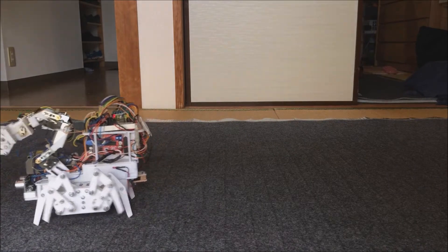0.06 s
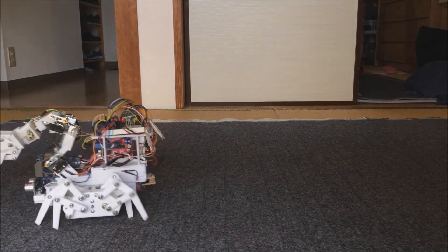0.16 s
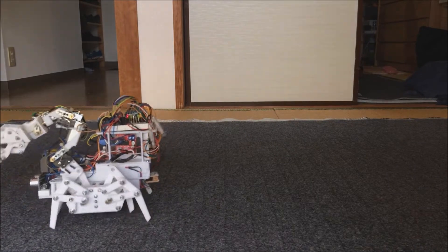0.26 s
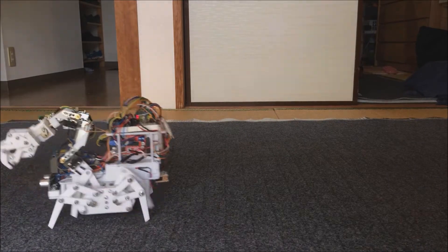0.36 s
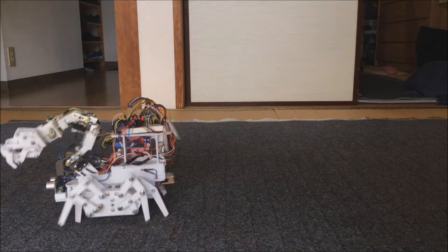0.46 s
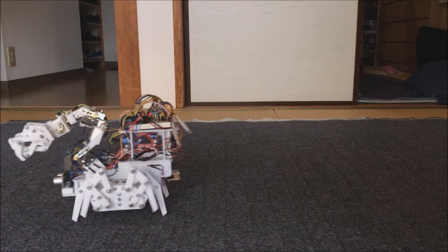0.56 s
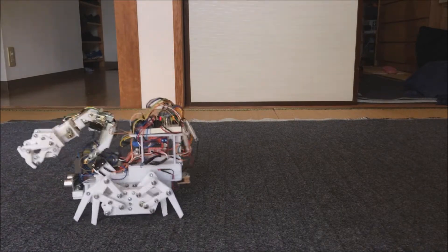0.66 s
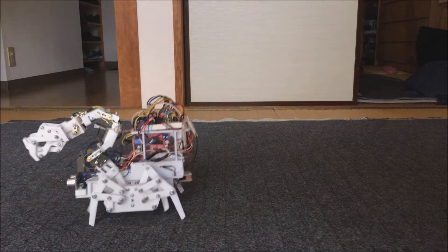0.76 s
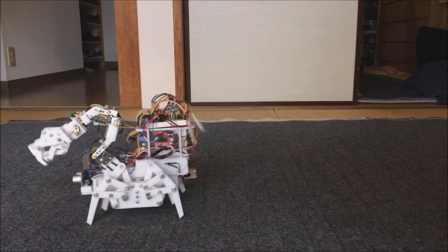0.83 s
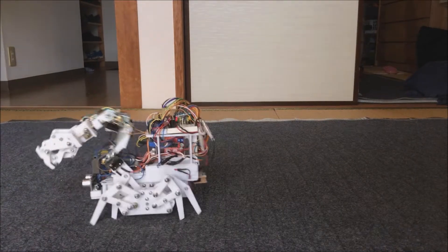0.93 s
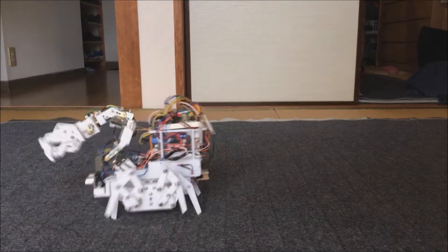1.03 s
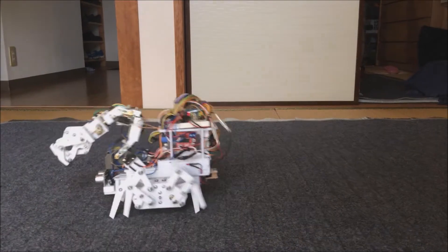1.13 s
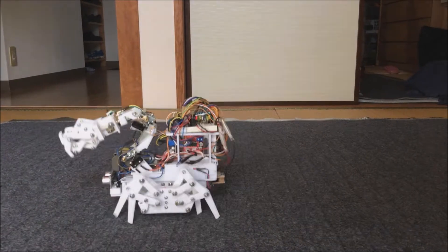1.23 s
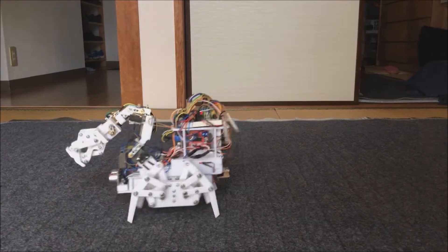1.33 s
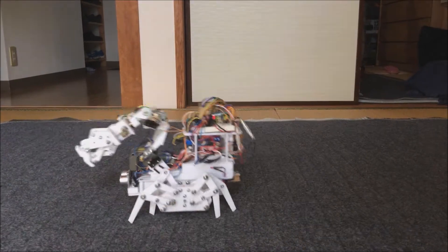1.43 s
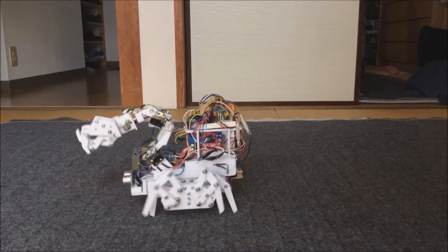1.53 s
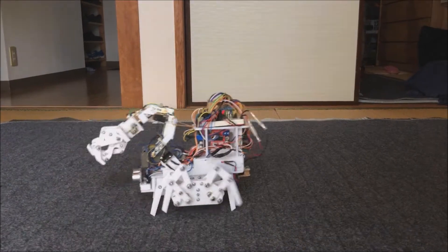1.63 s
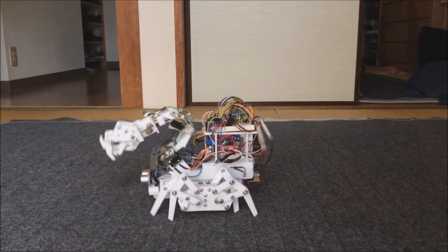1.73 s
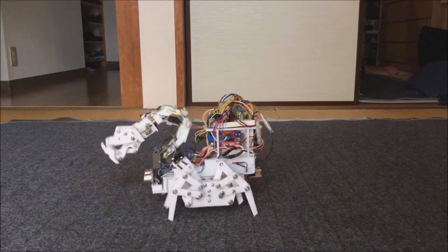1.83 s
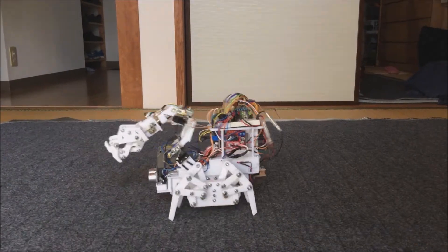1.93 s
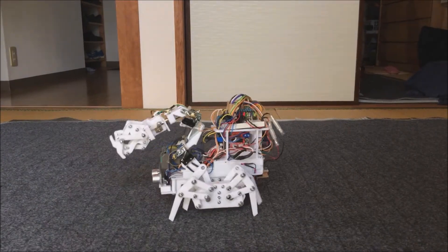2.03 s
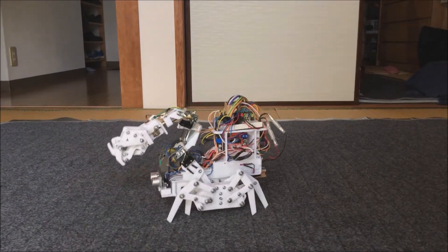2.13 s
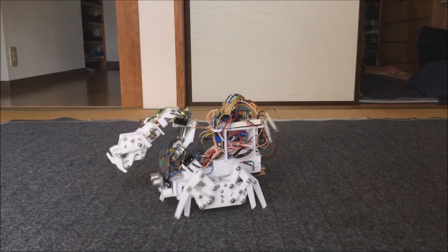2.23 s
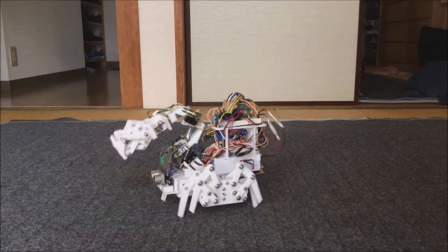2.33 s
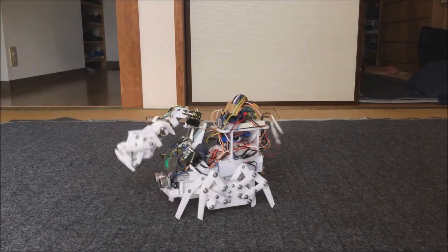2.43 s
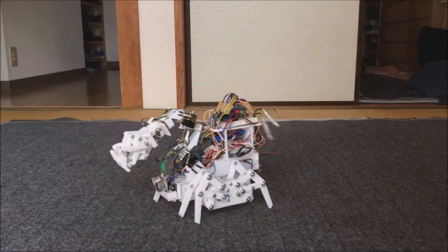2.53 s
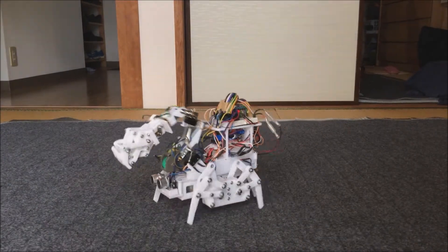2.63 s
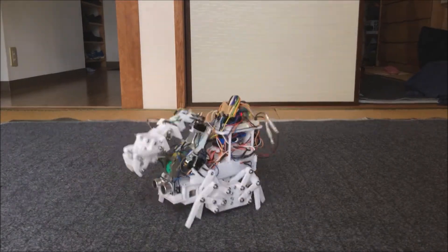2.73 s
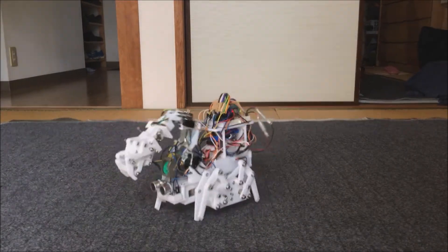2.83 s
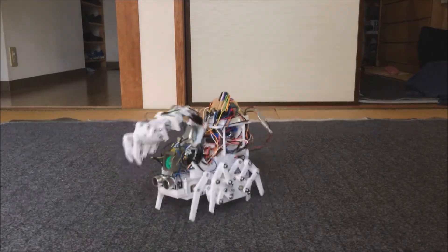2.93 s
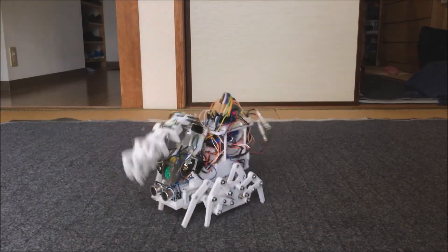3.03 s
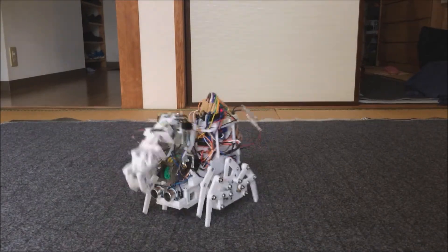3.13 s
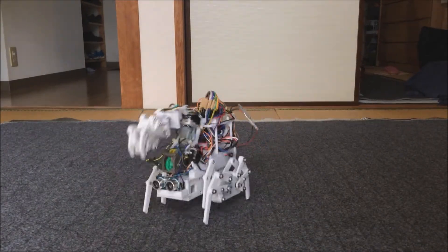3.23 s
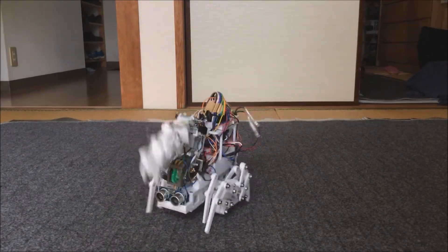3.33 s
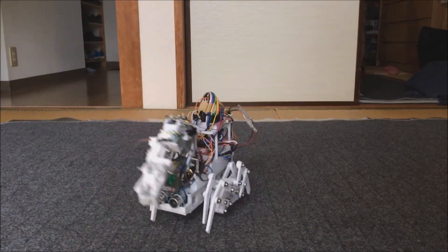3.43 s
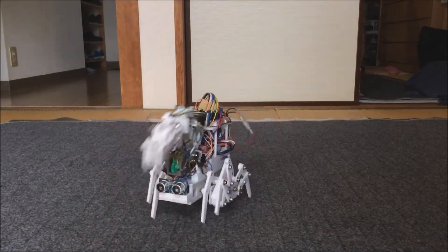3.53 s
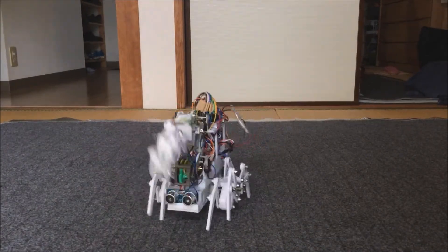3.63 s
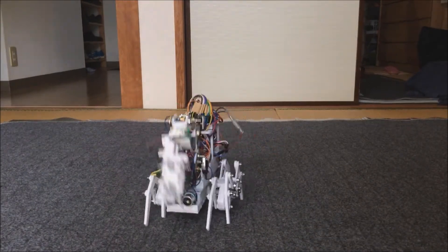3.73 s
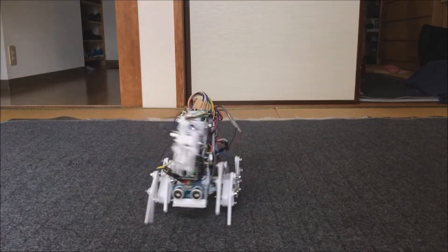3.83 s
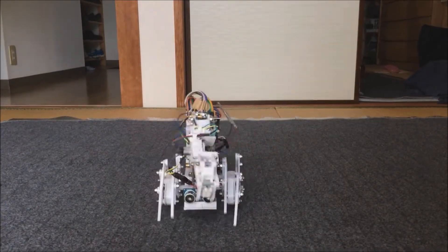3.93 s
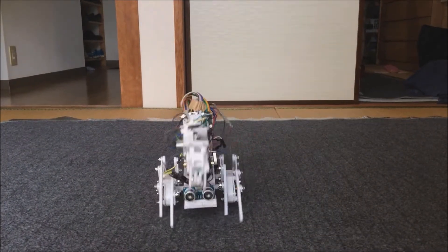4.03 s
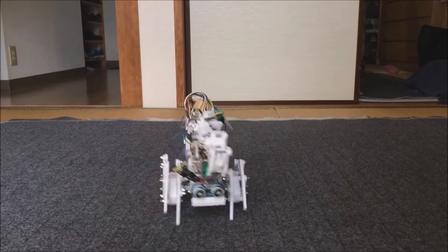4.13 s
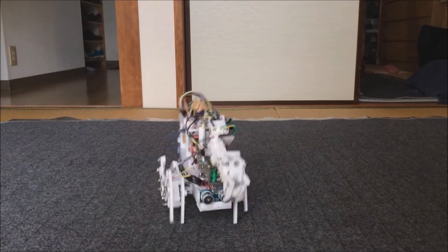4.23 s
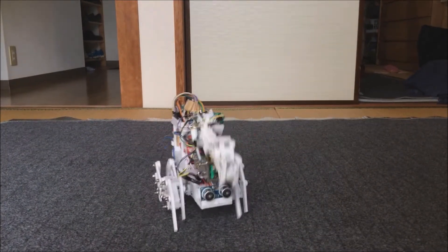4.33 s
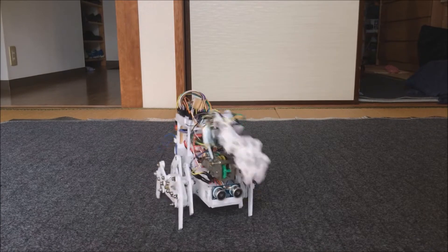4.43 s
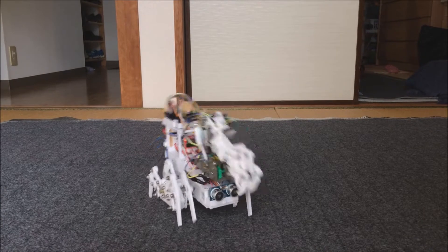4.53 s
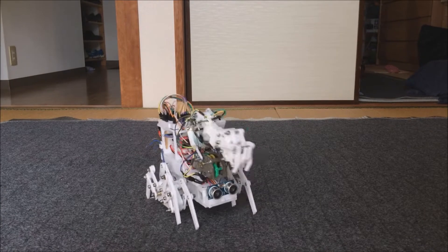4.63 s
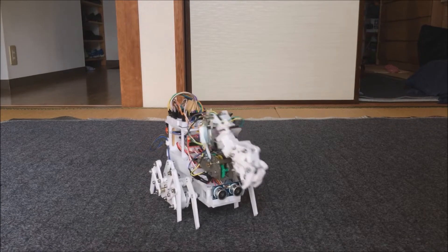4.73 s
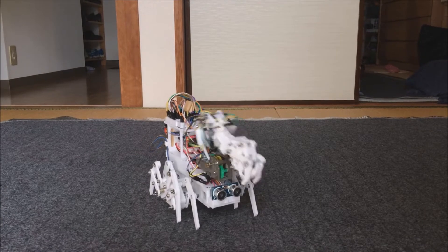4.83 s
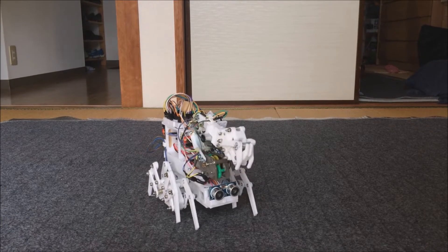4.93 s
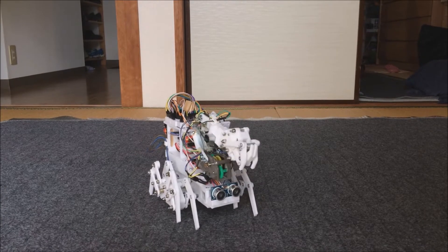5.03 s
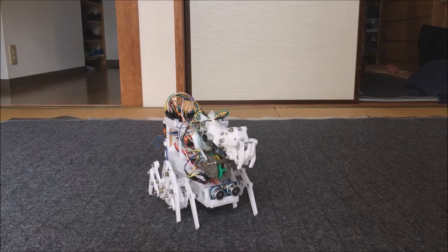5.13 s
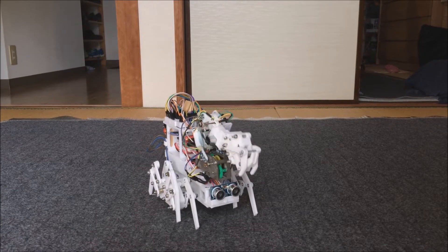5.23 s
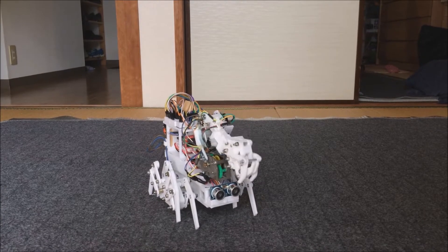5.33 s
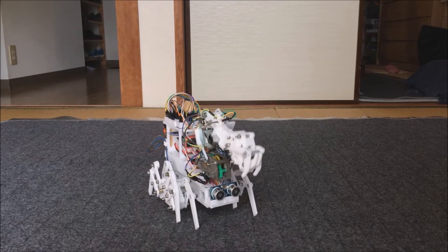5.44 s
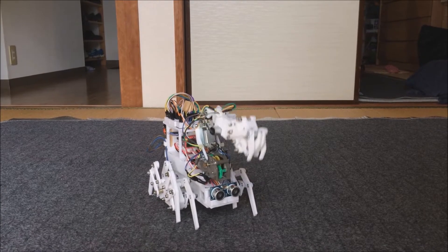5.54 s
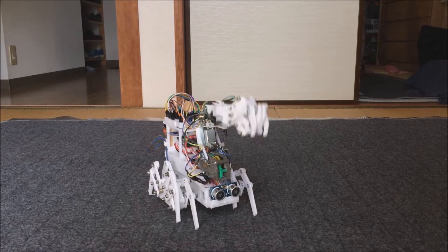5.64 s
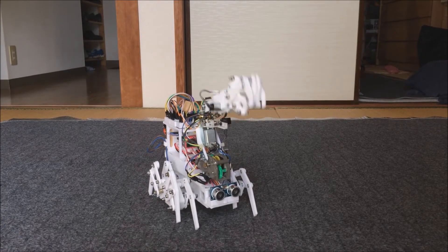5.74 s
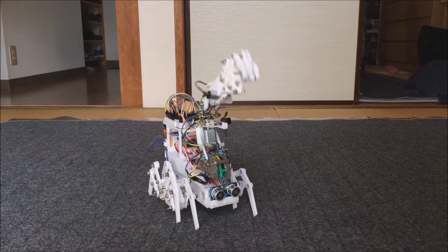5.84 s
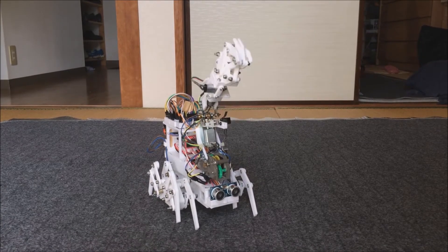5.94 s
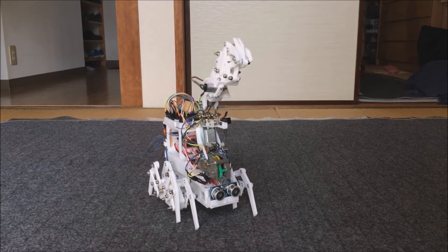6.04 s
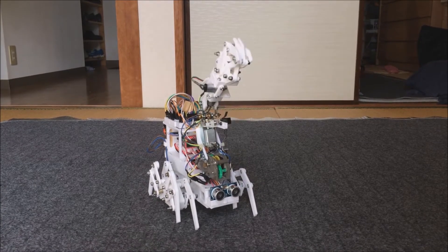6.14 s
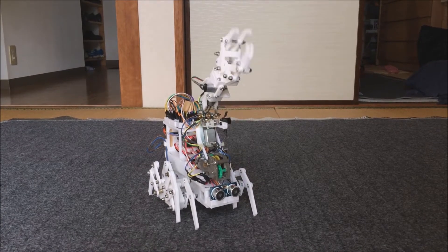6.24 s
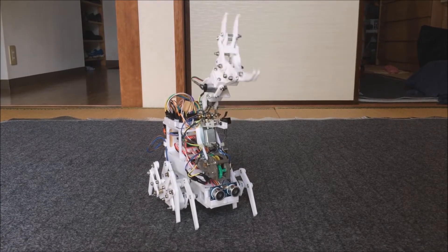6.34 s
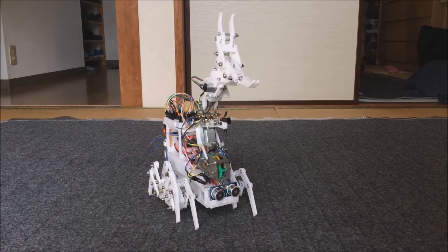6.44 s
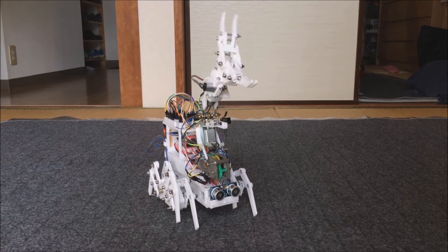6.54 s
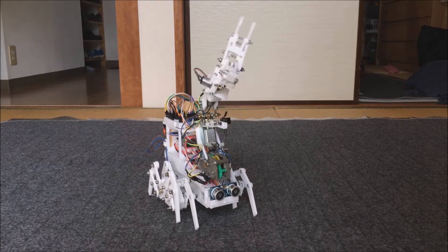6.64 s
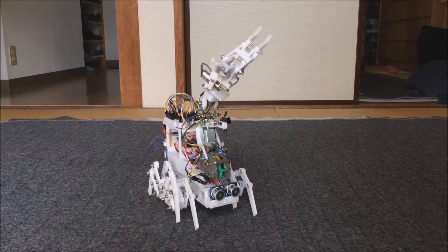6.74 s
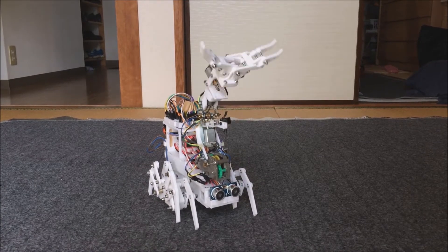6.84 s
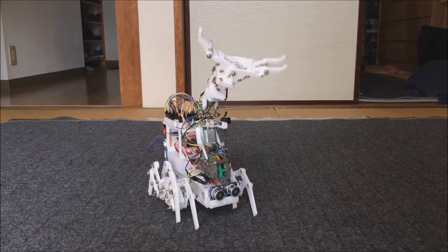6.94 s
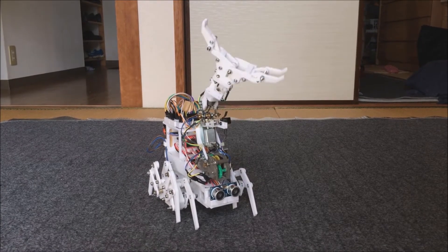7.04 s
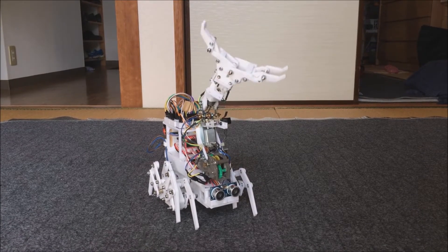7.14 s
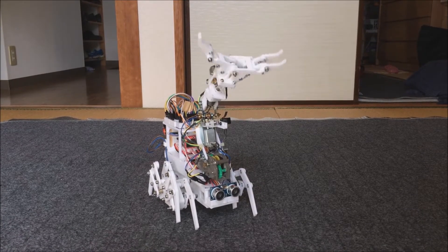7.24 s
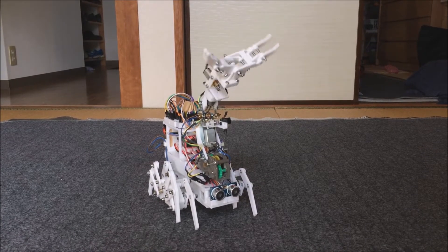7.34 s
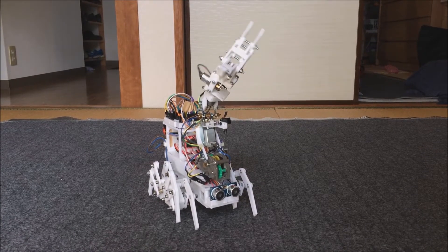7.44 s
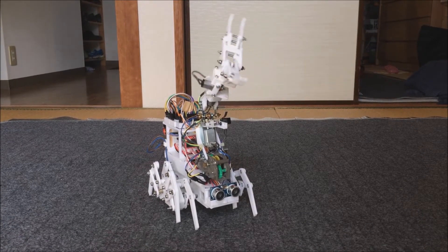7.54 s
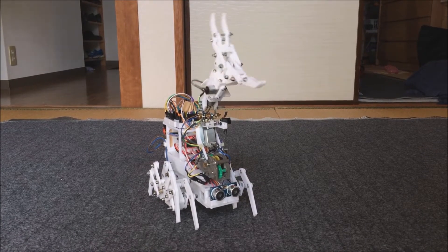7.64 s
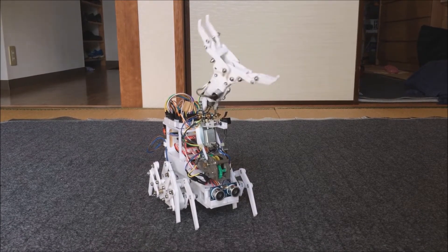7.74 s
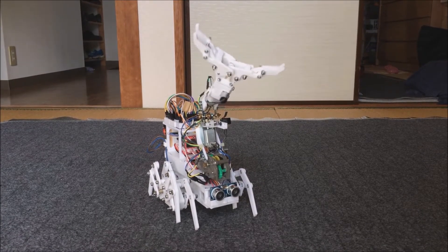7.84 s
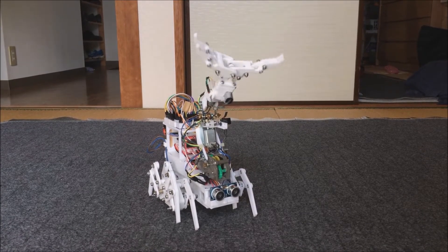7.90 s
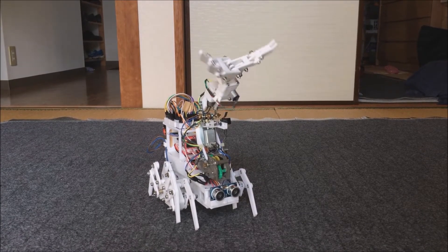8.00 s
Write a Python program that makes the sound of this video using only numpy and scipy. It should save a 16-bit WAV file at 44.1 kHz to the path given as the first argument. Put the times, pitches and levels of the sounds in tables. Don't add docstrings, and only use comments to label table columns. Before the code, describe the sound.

Harsh geared servo motors rattle and sing for nearly five seconds, stop, twitch and tick, give one sharp rising whine, then faint pulsing jaw hiss.

```python
import sys
import numpy as np
from scipy import signal
from scipy.fft import rfft, irfft, next_fast_len
from scipy.io import wavfile
from scipy.ndimage import uniform_filter1d

SR = 44100
rng = np.random.default_rng(int(sys.argv[2]) if len(sys.argv) > 2 else 0)


def natural_amplitude(level_db):
    exponent = np.asarray(level_db, float) / 20
    return 10 ** exponent


def pcm_store(signal):
    levels = np.round(np.clip(np.atleast_2d(signal), -1, 1) * 32767)
    wavfile.write(sys.argv[1], SR, levels.astype(np.int16).T)


N = 355887
T = np.arange(N) / SR


def unit(x):
    return x / np.sqrt(np.mean(x ** 2))


def columns(*tables):
    s, *rest = np.transpose(np.concatenate(tables))
    gate = np.clip(np.minimum(T - s[0], s[-1] - T) / 0.01 + 1, 0, 1)
    return [np.interp(T, s, column) for column in rest] + [gate]


def tent(start, end, rise_db_s, fall_db_s):
    return np.minimum(np.minimum((T - start) * rise_db_s, (end - T) * fall_db_s), 0)


def shape(x, gain):
    size = next_fast_len(N)
    hz = np.arange(size // 2 + 1) * SR / size + 1e-3
    return irfft(rfft(x, size) * gain(hz), size)[:N]


def colour(x, points):
    hz, db = np.transpose(points)
    return unit(shape(x, lambda f: natural_amplitude(np.interp(np.log(f), np.log(hz), db, -90, -90))))


def ring(x, hz, width):
    return unit(shape(x, lambda f: 1 / (1 + 2j * (f - hz) / width)))


def between(x, low_hz, high_hz):
    return unit(shape(x, lambda f: 1 / np.sqrt((1 + (low_hz / f) ** 12) * (1 + (f / high_hz) ** 12))))


def walk(rate, count=N):
    place = T[:count] * rate
    points = int(place[-1]) + 2
    return unit(np.interp(place, np.arange(points), rng.standard_normal(points)))


def teeth(hz, scatter_db, slop):
    turns = np.cumsum(hz) / SR + slop * walk(2500)
    out = 1. * (np.diff(np.floor(turns), prepend=0) > 0)
    out[out > 0] = natural_amplitude(scatter_db * rng.standard_normal(int(out.sum())))
    return out


def whine(hz, gate, wobble, flutter_db):
    out, on = np.zeros(N), gate > 0
    phase = 2 * np.pi * np.cumsum(hz[on] * (1 + wobble * walk(150, count=on.sum()))) / SR
    flutter = natural_amplitude(flutter_db * walk(70, count=on.sum()))
    out[on] = np.sqrt(2) * gate[on] * flutter * np.sin(phase)
    return out


def room():
    # frequency in Hz, density in dB per Hz.
    room_spectrum = [(12, -50.5), (20, -20), (107, 1), (153, -11.5), (186, -8), (260, -20.5), (691, -30.5),
                     (863, -32), (1080, -34.5), (2860, -39), (3200, -37), (4350, -49.5), (15700, -52)]
    # peak in seconds, rise in dB, half width in seconds.
    rumble_swells = [
        (.29, 8, 0.062),
        (.8, 9, 0.21),
        (1.3, 11.5, 0.15),
        (2.92, -7.5, 0.24),
        (5.53, -7, 0.25),
        (6.0, 3, 0.36),
    ]
    # start and end in seconds, frequency and width in Hz, level in
    # dB.
    drones = [
        (.2, 1.95, 311.6, 24, -65.5),
        (2.3, 2.85, 160.8, 12.2, -60),
        (3.4, 4.5, 100, 30.2, -64),
        (4.55, 5.75, 129, 16.48, -61),
        (5.749, 7.1, 84, 12, -61),
        (5.1, 8.0, 204, 27, -71.5),
        (6.6, 8.1, 120, 28, -63),
    ]
    air = colour(rng.standard_normal(N), room_spectrum)
    low = shape(air, lambda f: 1 / (1 + (f / 190) ** 4))
    swell_db = -64.5 + 4.5 * np.clip((7.9 - T) / 4.1, 0, 1)
    for s, db, half in rumble_swells:
        swell_db = swell_db + db * np.maximum(1 - np.abs(T - s) / half, 0)
    out = natural_amplitude(-55.5) * (air - low) + natural_amplitude(swell_db + 1.4 * walk(6.7)) * unit(low)
    for start, end, hz, width, db in drones:
        gate = np.clip(np.minimum(T - start, end - T) / 0.061, 0, 1)
        out = out + natural_amplitude(db) * gate * ring(rng.standard_normal(N), hz, width)
    return out


def squeaks():
    per_s, low_hz, high_hz, max_glide = 420, 800, 15000, .03
    out = np.zeros(N + SR)
    for when, pitch, length, glide, size in rng.random((int(per_s * N / SR), 5)):
        t = T[:int(np.interp(length, [0, 1], (.01, .035)) * SR)]
        hz = low_hz * (high_hz / low_hz) ** np.sqrt(pitch)
        bend = 1 + max_glide * (2 * glide - 1) * t / t[-1]
        level = natural_amplitude(3 * size) * np.sqrt(hz / np.log(2 * hz / low_hz))
        out[int(when * N):][:len(t)] += level * np.hanning(len(t)) * np.sin(2 * np.pi * hz * bend * t)
    return unit(out[:N])


def legs():
    # time in seconds, load in dB, rattle facing the microphone in dB.
    leg_load = [(0.002, -27, 1), (0.09, -27, 4.5), (0.5, -27.5, 5.5), (1.45, -27.5, 5), (1.8, -27, 4.5),
                (1.945, -27, 1), (1.99, -34, -1.5), (2.015, -30.5, 1), (2.045, -36, -3), (2.065, -32.5, 0),
                (2.11, -37.5, -1.5), (2.16, -34, 1), (2.22, -30, 0), (2.31, -28.5, 3), (2.9, -29, 6),
                (3.15, -30, 6), (3.5, -28, 4), (4.07, -27.5, 1), (4.65, -28, 2), (4.745, -34, -1),
                (4.84, -47, -2.5), (4.876, -59, -5)]
    # frequency in Hz, density in dB per Hz.
    walking_body = [(290, -60), (500, -37.5), (738, -23), (957, -14), (1190, -16), (1500, -11),
                    (1900, -4.5), (2270, -1.5), (3080, -3.5), (3610, -8.5), (4480, -5.5), (4880, -6.5),
                    (7210, -3.5), (8690, -6), (12300, -10), (15700, -10.5)]
    turning_body = [(290, -68), (500, -29), (658, -26.5), (865, -15), (1170, -19), (1280, -10.5),
                    (1500, -10), (1800, -5), (2240, 0.5), (2800, -3), (3820, -6), (5640, -6), (6420, -1),
                    (7630, -6), (8690, -4), (15700, -11)]
    mesh_hz = [936, 1001.5, 1782, 2062, 2297, 2466, 2642, 2966]
    case_db, facing_db, gate = columns(leg_load)
    slowed_db = np.maximum(-31.5 - case_db, 0)
    rattle_db = facing_db - 0.48 * slowed_db + 0.52 * walk(9.8)
    frame_db = -18.3 + 0.62 * slowed_db + 0.66 * facing_db + 0.55 * walk(14)
    sag_per_db = .012
    speeds = [hz * (1 - sag_per_db * slowed_db + .05 * walk(7) + .045 * walk(45)) for hz in mesh_hz]
    loads = np.array([natural_amplitude(4.5 * walk(45)) for hz in speeds])
    loads /= np.sqrt(np.sum(loads ** 2, axis=0))
    mesh = sum(load * unit(teeth(hz, scatter_db=4.5, slop=.105)) for load, hz in zip(loads, speeds))
    shake = unit(mesh) + 1.0 * rng.standard_normal(N) + natural_amplitude(-9) * squeaks()
    turned = np.clip((T - 2.05) / 0.1, 0, 1)
    grind = (1 - turned) * colour(shake, walking_body) + turned * colour(shake, turning_body)
    case = between(grind, 1564.0, 3820) * natural_amplitude(0.72 * walk(25) + 0.89 * walk(180))
    rattle = between(grind, 4330.0, 22000) * natural_amplitude(rattle_db + 0.74 * walk(60))
    frame = between(grind, 300, 1340.0) * natural_amplitude(frame_db + .5 * walk(25))
    floor = between(rng.standard_normal(N), 130, 520) * natural_amplitude(-37.0)
    return -gate * natural_amplitude(case_db - 1.7) * (case + rattle + frame + floor)


def strands():
    # start and end in seconds,
    # from and to Hz, dB.
    gear_strands = [(.03, 0.197, 2266, 2420, -38.5), (.06, .12, 3110, 2937, -34.5),
                    (.18, 0.279, 1850, 1816, -38.5), (0.549, 0.603, 2590, 2605, -27.5),
                    (0.581, .73, 3060, 3020, -37), (0.632, .7, 2090, 2014, -39),
                    (0.929, 0.994, 2350, 2320, -34), (1.25, 1.35, 2250, 2230, -36),
                    (1.382, 1.47, 2450, 2515, -33.5), (1.489, 1.53, 2720, 2780, -42),
                    (1.501, 1.6, 2250, 2370, -36), (1.6, 1.682, 2950, 2840, -36),
                    (1.73, 1.84, 2230, 2203, -31.5), (1.88, 1.95, 2310, 2435, -47),
                    (2.501, 2.57, 1630, 1720, -43), (2.652, 2.718, 3250, 3330, -44),
                    (3.209, 3.3, 2850, 2760, -37.5), (3.33, 3.391, 2310, 2150, -32),
                    (3.53, 3.57, 2780, 2930, -32.5), (3.8, 3.84, 2200, 2350, -30),
                    (3.88, 3.9, 2270, 2350, -32), (3.73, 3.76, 6600, 6600, -44), (.6, .64, 7840, 7760, -35),
                    (1.79, 1.84, 4300, 4770, -32), (4.011, 4.062, 2840, 2620, -34),
                    (4.079, 4.157, 2500, 2350, -36.5), (4.271, 4.33, 2800, 2840, -35.5),
                    (4.327, 4.374, 2640, 2575, -31.5), (4.383, 4.45, 2660, 2693, -36),
                    (4.38, 4.45, 1750, 1820, -36.5), (4.55, 4.702, 2500, 2250, -36.5),
                    (5.535, 5.6, 2740, 2960, -43), (5.764, 5.87, 2930, 3150, -52.5),
                    (5.94, 5.97, 7320, 7200, -39.5), (5.99, 6.045, 5140, 3770, -43),
                    (5.57, 5.63, 5650, 6270, -43), (5.72, 5.96, 5800, 6250, -49)]
    # start and end in seconds, from and to Hz, level in dB.
    motor_hums = [(.08, 0.243, 760, 969, -47), (.28, .45, 1000, 997, -53), (0.699, .78, 960, 913, -50),
                  (1.019, 1.2, 960, 1014, -45), (1.201, 1.379, 950, 1030, -47.5),
                  (1.481, 1.799, 1000, 951, -47), (2.218, 2.401, 1250, 1530, -44),
                  (2.38, 2.524, 840, 905, -48.5), (2.6, 2.75, 850, 878, -53.5),
                  (3.081, 3.16, 1030, 1050, -48), (3.45, 3.6, 880, 884, -60), (3.622, 3.8, 1000, 977, -52),
                  (3.679, 3.856, 1320, 1282, -49.5), (3.95, 4.121, 900, 793, -49.5),
                  (4.3, 4.446, 1000, 975, -58.5), (4.519, 4.648, 900, 810, -53.5)]
    # start and end in seconds, from and to Hz, level in dB.
    jaw_tones = [
        (6.31, 6.5, 5330, 5400, -82),
        (6.71, 6.82, 5130, 5210, -80),
        (6.9, 7.11, 5280, 5350, -80),
        (7.11, 7.16, 6150, 6200, -74),
        (7.37, 8.1, 5420, 5330, -79),
        (7.4, 8.0, 4730, 4710, -84),
        (7.3, 7.56, 5950, 6080, -83),
        (7.8, 8.1, 2760, 2740, -76),
    ]
    out = np.zeros(N)
    kinds = [(gear_strands, .02, -.5, 3.5), (motor_hums, .025, -1, 3.5), (jaw_tones, .006, 0, 2)]
    for table, wobble, lift_db, flutter_db in kinds:
        for start, end, from_hz, to_hz, db in table:
            gate = np.clip(np.minimum(T - start, end - T) / .02 + .5, 0, 1)
            hz = np.interp(T, [start, end], [from_hz, to_hz])
            out += natural_amplitude(db + lift_db) * whine(hz, gate, wobble=wobble, flutter_db=flutter_db)
    return out


def footfalls():
    # time in seconds, peak in dB, frequency in Hz.
    steps = [
        (0.257, -42, 72.56),
        (0.676, -29.5, 65.5),
        (0.829, -50, 59.22),
        (1.19, -36, 84.5),
        (1.27, -46, 80.44),
        (2.162, -42.5, 78.18),
        (3.448, -45, 90),
        (4.398, -41, 99),
    ]
    out, t = np.zeros(N + SR), T[:SR // 4]
    swell = t / 0.0265 * np.exp(1 - t / 0.015)
    for s, db, hz in steps:
        out[int(s * SR):][:len(t)] += natural_amplitude(db + 1.5) * np.sin(2 * np.pi * hz * t) * swell
    return out[:N]


def ticks():
    # time in seconds, peak in dB, ring in Hz.
    joint_ticks = [(2.058, -16, 2890), (4.8688, -29, 3300), (5.3177, -36, 3870), (5.4206, -28, 2900),
                   (5.73, -10, 9800), (5.838, -4, 10000), (4.9993, -30, 2810), (5.038, -27, 3960),
                   (5.093, -25, 3540), (5.2274, -42.5, 3520), (5.248, -38.5, 3945), (5.2695, -37, 4050),
                   (4.964, -36, 3612), (5.3244, -35, 3589), (5.3712, -23.5, 3812), (5.3706, -28, 4750),
                   (5.3986, -35.5, 3350), (5.4675, -24, 2706), (6.2803, -40, 8220), (6.565, -41, 8670),
                   (7.8568, -41, 8800)]
    out, t = np.zeros(N + SR), T[:SR // 4]
    cracks = rng.standard_normal((len(joint_ticks), len(t)))
    for (s, db, hz), crack in zip(joint_ticks, cracks):
        crack = signal.sosfilt(signal.butter(2, .7 * hz, "high", fs=SR, output="sos"), crack)
        plastic = np.sin(2 * np.pi * hz * t) * np.exp(-t / 0.0041)
        tick = 0.59 * crack * np.exp(-t / 0.0011) + 0.22 * plastic
        out[int(s * SR):][:len(t)] += natural_amplitude(db - 4.0) * tick
    return out[:N]


def singing_drives():
    # time in seconds, pitch in Hz, level in dB.
    loaded_song = [(2.215, 2020, -32), (2.26, 2140, -29), (2.33, 2170, -30), (2.38, 2330, -31.5),
                   (2.43, 2500, -35), (2.47, 2740, -33), (2.53, 2610, -31), (2.6, 2680, -33),
                   (2.65, 2640, -39)]
    second_song = [
        (2.89, 2680, -45),
        (2.93, 2650, -31),
        (2.99, 2640, -36),
    ]
    # time in seconds, pitch in Hz, level in dB.
    twitches = [
        [(4.925, 712, -74.5), (4.95, 866, -69.5), (4.99, 1133, -70), (5.03, 1317, -67), (5.06, 1450, -68)],
        [(5.095, 1468, -53.5), (5.11, 1285, -57), (5.135, 907, -65), (5.155, 585.6, -68)],
        [(4.98, 390, -69.5), (5.04, 460, -75), (5.08, 506, -68), (5.12, 464.5, -67)],
        [(5.015, 3830, -65.5), (5.04, 4016, -62), (5.08, 3943, -50.5), (5.11, 3700, -62), (5.145, 3250, -57.5)],
        [(5.205, 3500, -66), (5.235, 3750, -63), (5.27, 3950, -60), (5.295, 3900, -64)],
    ]
    out = np.zeros(N)
    for table in [loaded_song, second_song, *twitches]:
        hz, db, gate = columns(table)
        out = out + natural_amplitude(db) * whine(hz, gate, wobble=.007, flutter_db=2.0)
    return out


def fidget():
    # peak in seconds, level in dB, rise and fall in dB per second.
    bursts = [
        (4.886, -49, 500, 400),
        (4.938, -45.5, 230.5, 146),
        (5.04, -53, 100, 200),
        (5.1, -44.5, 500, 77),
        (5.155, -40, 69, 400),
        (5.272, -49.5, 55, 128),
        (5.375, -49, 1999.5, 350.5),
        (5.435, -41.5, 310, 900),
        (5.47, -46, 1500, 43.5),
        (5.5, -47.5, 200, 900),
    ]
    # frequency in Hz, density in dB per Hz.
    standing_body = [(410, -42), (700, -21), (1380, -12), (1700, -12), (2350, -4.5), (2610, -10),
                     (3520, -2.5), (5190, -11.5), (6830, -11), (10200, -9), (15700, -2.5)]
    db = np.max([top + tent(s, s, rise, fall) for s, top, rise, fall in bursts], axis=0)
    treble_db = -2.5 + 0.33 * np.clip(-48.5 - db, -10, 10)
    grains = rng.standard_normal(N) * natural_amplitude(2.0 * walk(500) + 3.0 * rng.standard_normal(N))
    body = colour(grains, standing_body)
    cover = natural_amplitude(-26.0 + 3.2 * walk(26)) * ring(grains, 2800, 250)
    treble = natural_amplitude(treble_db) * between(body, 5100, 18000)
    return natural_amplitude(db - 4.0) * (between(body, 584.4, 7800) + cover + treble)


def neck():
    # time in seconds, whine in Hz, level in dB.
    pinion = [(5.5, 2900, -66), (5.53, 3150, -53), (5.565, 3650, -47), (5.6, 3960, -43.5),
              (5.67, 4530, -45), (5.705, 4760, -44.5), (5.74, 4710, -44), (5.806, 4850, -44.5),
              (5.854, 4612, -44), (5.892, 4784, -48), (5.962, 4954, -44), (5.986, 4216, -47),
              (6.01, 3750, -55), (6.04, 3500, -60)]
    # multiple of the whine frequency, level against it in dB.
    gear_orders = [(.185, -26), (.4, -18), (.66, -16), (1.0, 5.5), (1.25, -4.5)]
    # frequency in Hz, density in dB per Hz.
    neck_body = [(350, -66), (600, -36), (1600, -28.5), (2350, -12), (3130, -5), (3690, -9.5), (4660, -6),
                 (5480, -7), (8040, -9), (9870, -2.5), (10900, -11), (12100, -8), (15700, -9)]
    full_s, cut_s = 5.6065, 6
    ring_hz, ring_width = 9980, 620
    hz, whine_db, turning = columns(pinion)
    upper_db = -40.5 + np.maximum(tent(5.675, 5.865, 400, 300), -13) + tent(5.57, 5.97, 350, 300)
    grind_db = -27 + uniform_filter1d(tent(full_s, cut_s, 147, 241), int(0.0864 * SR))
    ring_db = -9.5 - 6 * np.maximum(4600 - hz, 0) / 1000 + 1.9 * walk(40)
    orders = natural_amplitude(upper_db) * whine(1.5 * hz, turning, wobble=.01, flutter_db=3.0)
    for k, db in gear_orders:
        orders = orders + natural_amplitude(whine_db + db) * whine(k * hz, turning, wobble=.012, flutter_db=2.2)
    mesh = unit(teeth(hz / 2, scatter_db=2.5, slop=0.26)) + 1.96 * rng.standard_normal(N)
    case_ring = natural_amplitude(ring_db) * ring(ring(mesh, ring_hz, ring_width), ring_hz, ring_width)
    grind = natural_amplitude(-1.5 + .5 * walk(60)) * colour(mesh, neck_body) + case_ring
    coast = natural_amplitude(-57 + tent(cut_s, 6.11, 300, 490.0)) * between(mesh, 1600, 5100)
    return natural_amplitude(1.5) * orders + natural_amplitude(grind_db) * grind + coast


def jaw():
    # first tooth and end in seconds, teeth per second, hiss in dB, drift in dB per second.
    strokes = [
        (6.288, 6.575, 39, -52.5, 4),
        (6.677, 7.145, 21, -53, -1),
        (7.163, 7.388, 22.5, -60, 2),
        (7.413, 7.76, 30, -59, -10),
        (7.78, 8.08, 31, -59, 9.5),
    ]
    # start and end in seconds, low ring in dB, upper rings against it in dB.
    case_hums = [
        (6.297, 6.559, -67.5, -9),
        (6.684, 7.11, -74, 5),
        (7.302, 8.1, -73, 1.5),
    ]
    # frequency in Hz, width in Hz, level in dB.
    case_rings = [(2010, 60, -9), (2741, 300, 2.5), (4730, 50, -16), (5350, 160, -8), (8730, 160, -6)]
    # frequency in Hz, density in dB per Hz.
    open_body = [(1760, -48.5), (3000, -28), (3370, -8.5), (4330, -10), (5080, -6), (6080, -7), (6520, -4),
                 (9020, 4), (13300, 3), (15700, 2)]
    bite_body = [(1760, -41), (3000, -18), (3370, -14), (5710, -7), (6250, -5), (8080, -9), (8480, -2),
                 (10900, -3), (14300, -1), (15700, -4)]
    tooth_db, scatter_db, jitter_s, light_db = 16, -5, .002, -57
    hiss, throb = np.zeros((2, N))
    hum = sum(natural_amplitude(db + tent(start, end, 300, 300)) for start, end, db, _ in case_hums)
    upper = sum(natural_amplitude(db + up_db + tent(start, end, 300, 300)) for start, end, db, up_db in case_hums)
    for start, end, rate, hiss_db, drift_db in strokes:
        stroke = natural_amplitude(tent(start + 0.016, end, 200, 201))
        hiss = np.maximum(hiss, natural_amplitude(hiss_db + drift_db * (T - start)) * stroke)
        throb_db = hiss_db - 0.6896 * max(hiss_db - light_db, 0) + tooth_db
        for s, (late, size) in zip(np.arange(start, end, 1 / rate), rng.standard_normal((20, 2))):
            swell = throb[int((s + jitter_s * late) * SR) - 300:][:2000]
            t = T[:len(swell)]
            level = natural_amplitude(throb_db + drift_db * (s - start) + scatter_db * size)
            swell += level * t / 0.011 * np.exp(1 - t / 0.0043)
    grit = rng.standard_normal(N) * natural_amplitude(2.5 * rng.standard_normal(N))
    closing = np.clip(np.minimum(T - 7.1, 7.85 - T) / 0.051, 0, 1)
    scrape = (1 - closing) * colour(grit, open_body) + closing * colour(grit, bite_body)
    motor_hz = 62 * (1 + .1 * walk(30))
    buzz = unit(teeth(motor_hz, scatter_db=2.0, slop=0)) + .75 * rng.standard_normal(N)
    low, *high = (natural_amplitude(db) * ring(ring(buzz, hz, width), hz, width) for hz, width, db in case_rings)
    rings = hum * low + upper * sum(high) * (0.59 + 0.058 * throb / (hiss + natural_amplitude(-71.5)))
    friction = scrape * (natural_amplitude(-5.0 + 1.04 * walk(7.1)) * hiss + natural_amplitude(-16.5) * throb)
    return friction + natural_amplitude(-1.9 + 1.2 * walk(45)) * rings


def scene():
    robot = legs() + strands() + footfalls() + ticks() + singing_drives() + fidget() + neck() + jaw()
    t = T[:SR // 4]
    tail = rng.standard_normal(SR // 4) * np.exp(-np.log(1000) * t / 0.24)
    echo = signal.fftconvolve(robot, tail / np.sqrt(np.sum(tail ** 2)))[:N]
    echo = shape(echo, lambda f: 1 / np.sqrt(1 + (f / 6935.5) ** 2))
    return np.tile(robot + natural_amplitude(-13) * echo + room(), (2, 1))


def partials(x, start, span, known=(), count=7, size=640):
    spectrum = rfft(x[start:start + size] * np.hanning(size))
    hz = np.arange(len(spectrum)) * SR / size
    tops = signal.argrelmax(np.abs(spectrum), order=4)[0]
    tops = tops[np.argsort(-np.abs(spectrum[tops]) * hz[tops] ** .15)[:count]]
    sizes, hz = spectrum[tops], hz[tops]
    if known:
        sizes, hz = np.exp(1j * np.angle(sizes[:len(known)])), known
    held = np.real(sizes @ np.exp(2j * np.pi * np.outer(hz, T[span] - start / SR)))
    return unit(held) * np.std(x[start:start + size])


def bridge(x):
    # centre in seconds, length in seconds, held partials in dB.
    lost_packets = [(.236, .039, -2), (.481, .014, -3), (.567, .016, -5), (.609, .013, 0),
                    (.779, .015, -11), (1.12, .013, -3), (1.441, .014, -1), (1.975, .014, -4),
                    (2.144, .014, 0), (2.421, .016, -5), (2.912, .014, -3), (3.36, .016, 1),
                    (3.415, .038, -2), (4.854, .015, -5), (5.067, .016, -8), (5.302, .016, -3),
                    (5.685, .017, -3), (6.305, .015, -2), (6.88, .017, -1), (7.137, .015, -1),
                    (7.243, .018, 0), (7.521, .016, -1), (7.926, .019, 0), (8.011, .015, -4)]
    known_partials = {.236: ([1870, 2650, 3760, 7180, 7670, 8850],
                      [1820, 2210, 2610, 2820, 5430, 6220, 8730]),
                      3.415: ([2220, 2450, 2830, 6450, 6520, 8400], [2200, 5070, 6280, 6950, 7020]),
                      5.685: ([3050, 4560, 4640, 7050, 9750], [3100, 4620, 4700, 7120, 9800])}
    out = x.copy()
    for s, length, db in lost_packets:
        mid, half = int(s * SR), int(length * SR / 2)
        span = slice(mid - 1400, mid + 1400)
        late = np.clip(.5 + (T[span] - s) / (length + .02), 0, 1) * np.pi / 2
        hz_before, hz_after = known_partials.get(s, ((), ()))
        before = partials(x, mid - half - 400, span, hz_before)
        after = partials(x, mid + half - 240, span, hz_after)
        held = np.cos(late) * before + np.sin(late) * after
        depth = .74 if length < .027 else .93
        lost = np.clip((length / 2 + .0075 - np.abs(T[span] - s)) / .016, 0, depth) * np.pi / 2
        out[span] = out[span] * np.cos(lost) ** 2 + natural_amplitude(db - 1.0) * held * np.sin(lost)
    return out


def top_cut(x):
    return signal.sosfilt(signal.butter(12, 17090, fs=SR, output="sos"), x)


def record(dry):
    rounded = np.tanh(1.6 * dry[0]) / 1.6
    heard = shape(bridge(rounded), lambda f: 1 / (1 + (f / 15760) ** 400))
    return top_cut(np.tile(heard, (2, 1)))


dry = scene()
out = record(dry)
pcm_store(out)
```